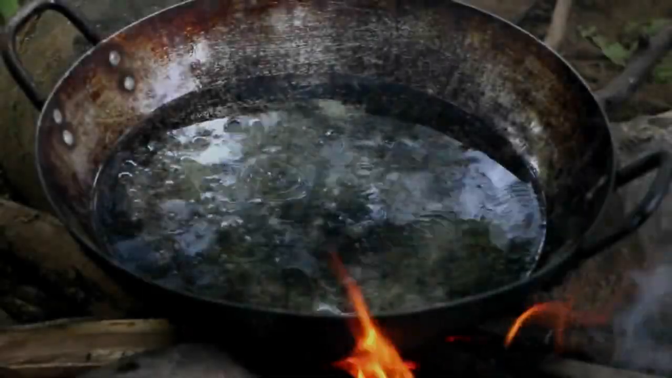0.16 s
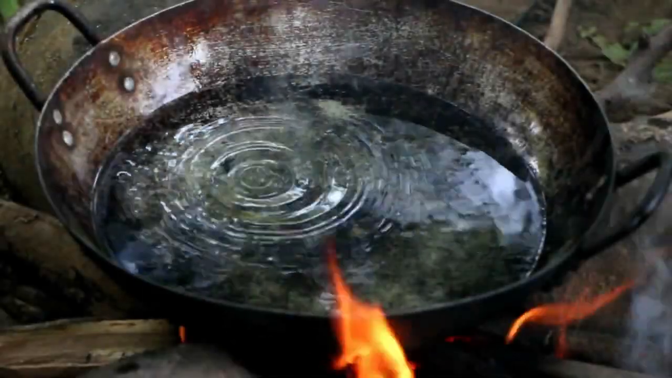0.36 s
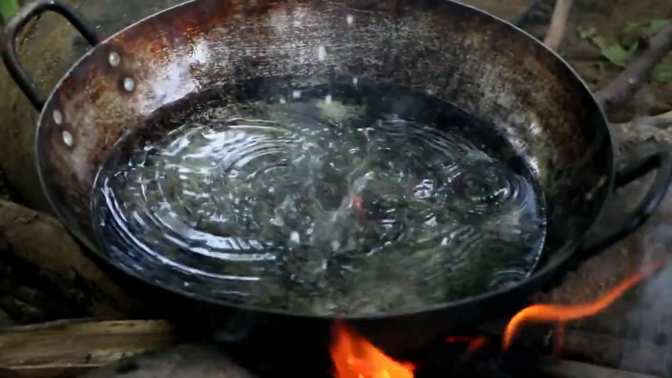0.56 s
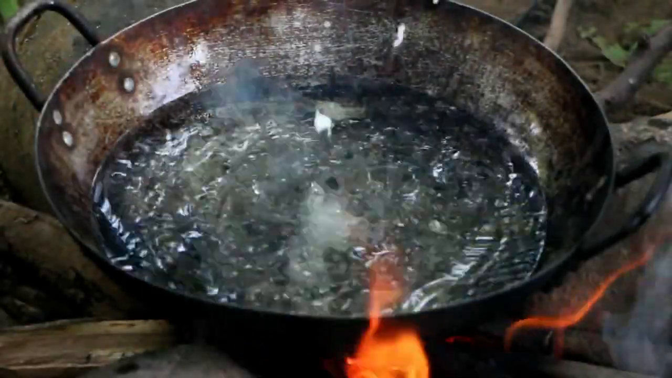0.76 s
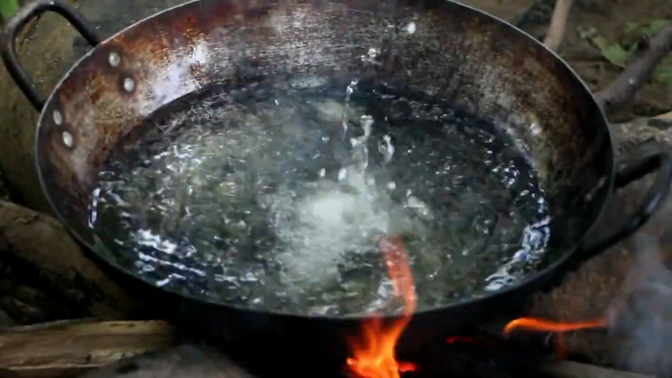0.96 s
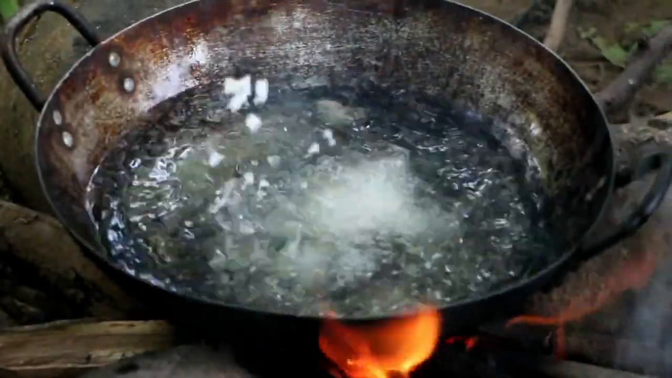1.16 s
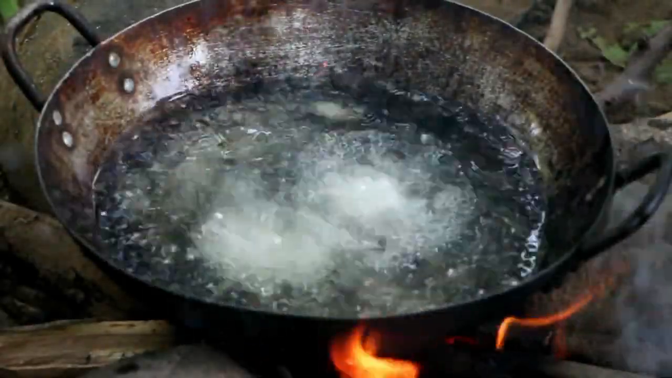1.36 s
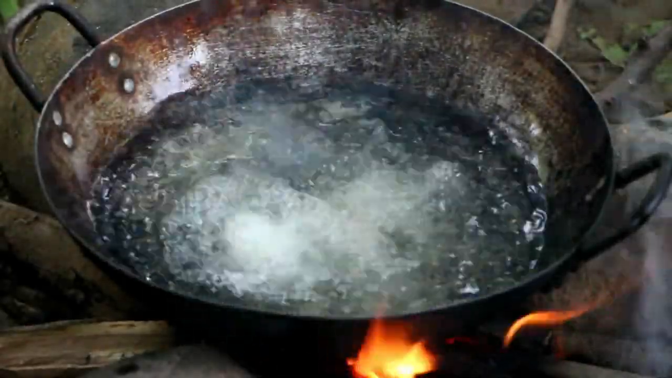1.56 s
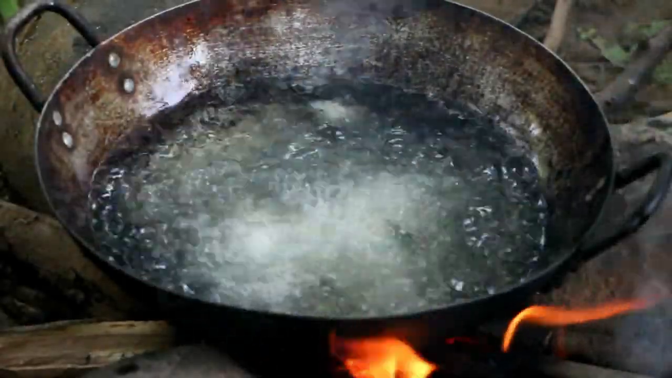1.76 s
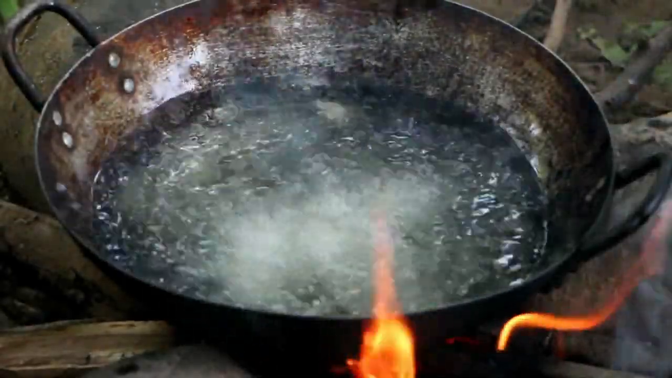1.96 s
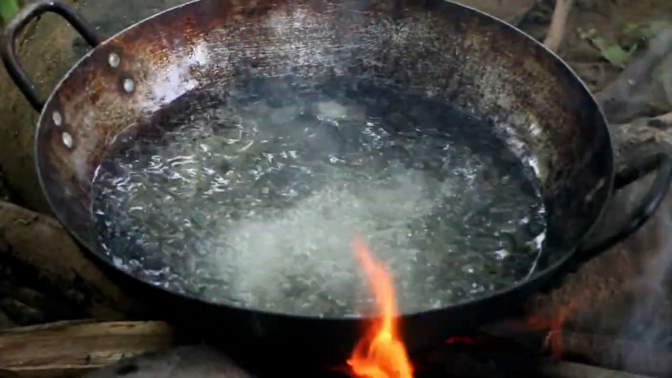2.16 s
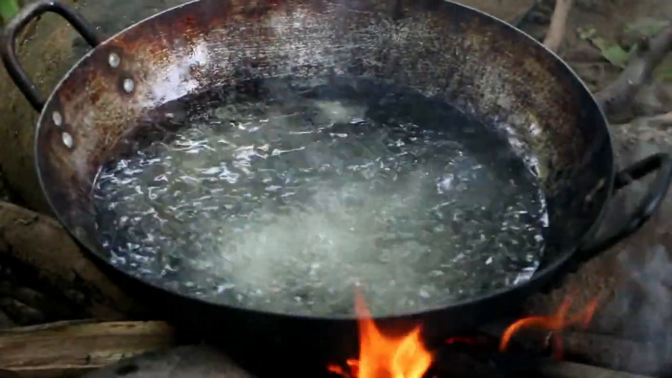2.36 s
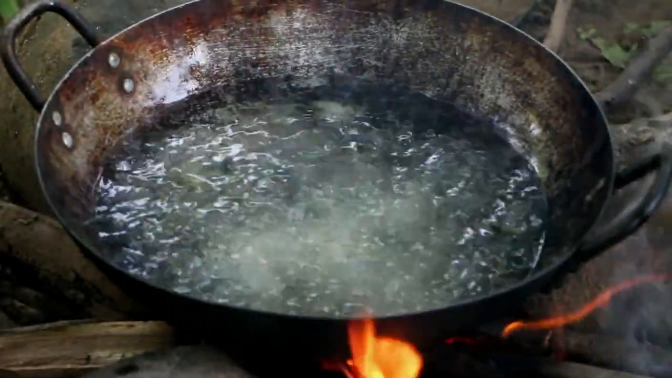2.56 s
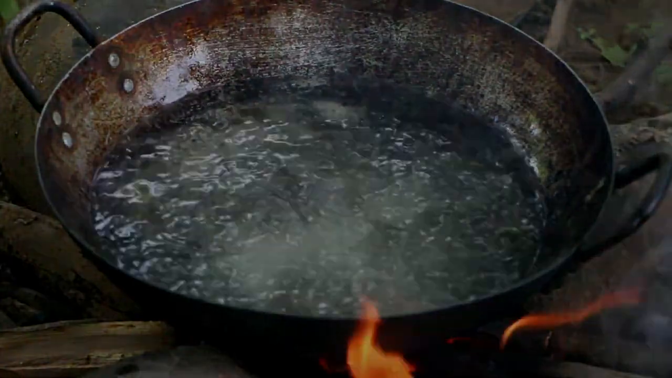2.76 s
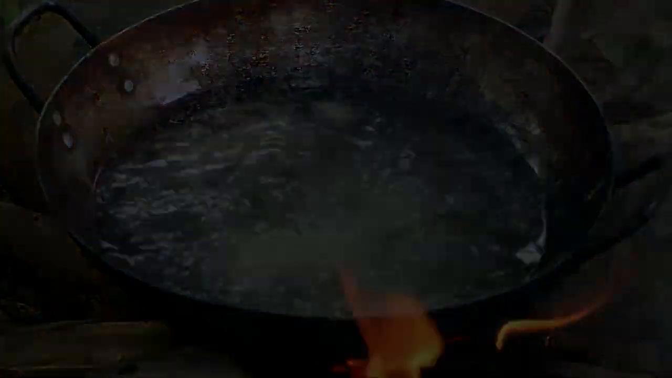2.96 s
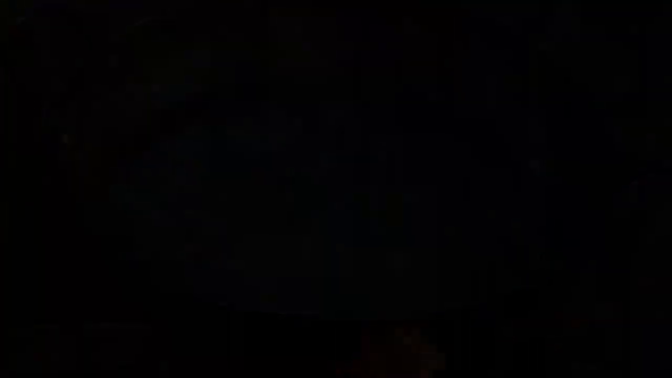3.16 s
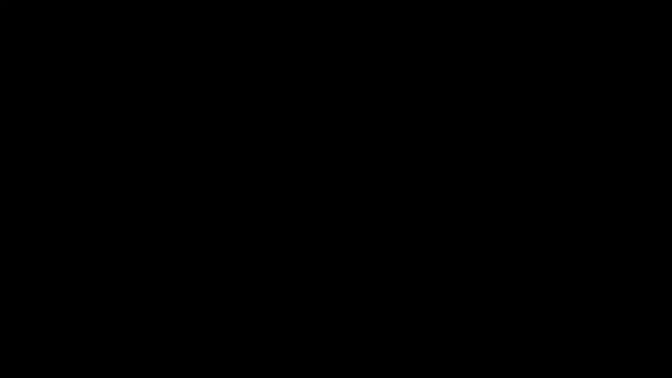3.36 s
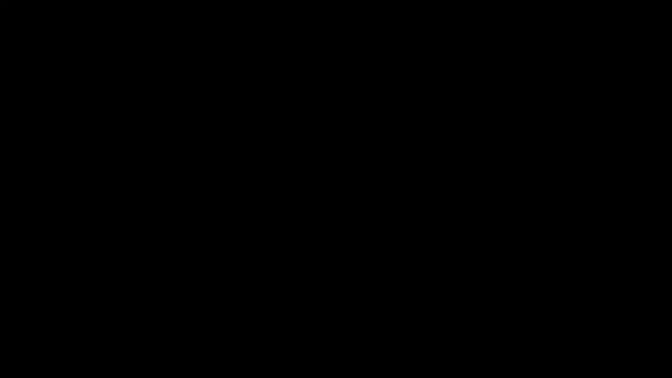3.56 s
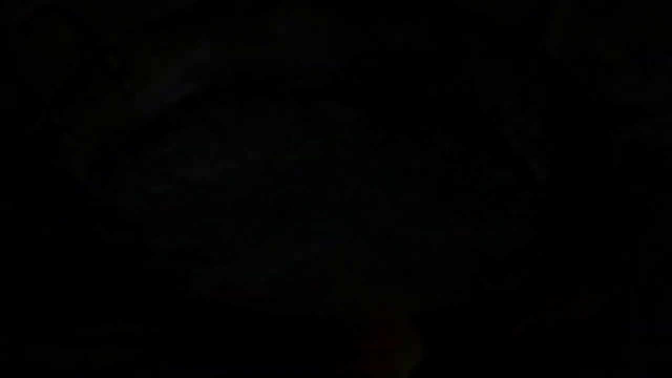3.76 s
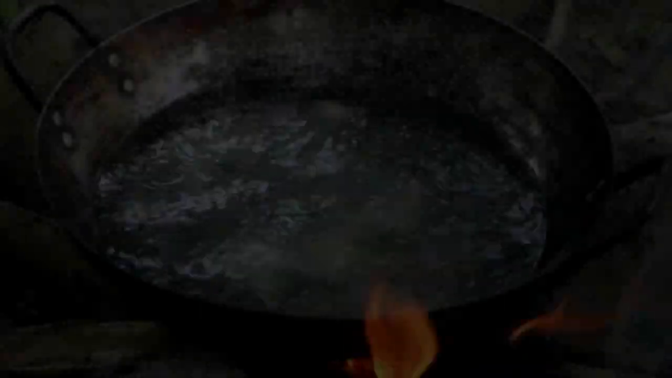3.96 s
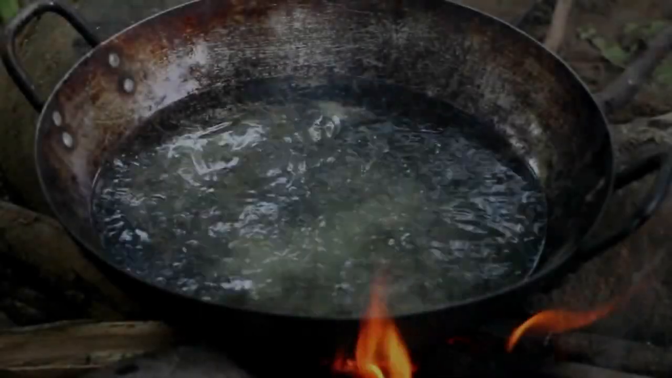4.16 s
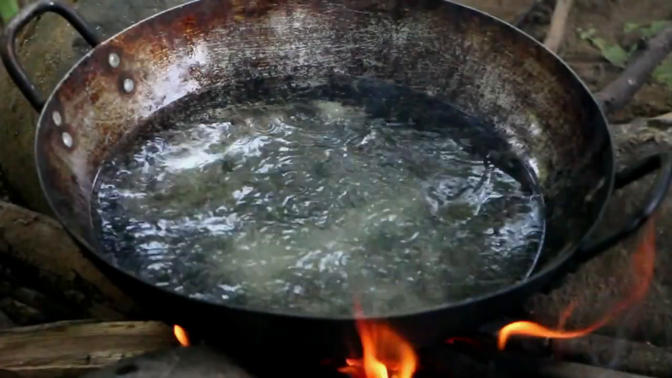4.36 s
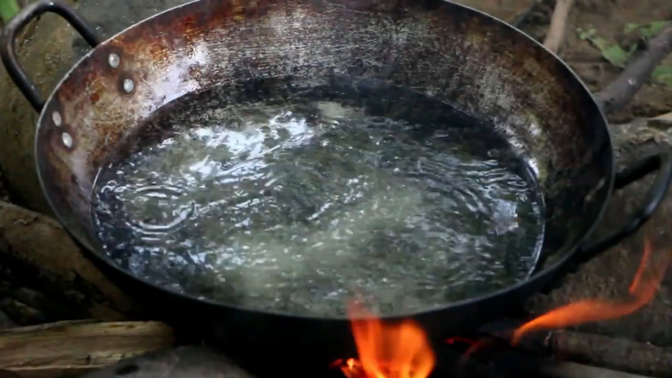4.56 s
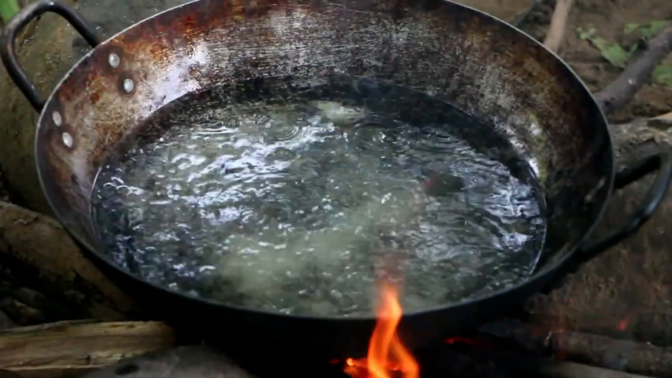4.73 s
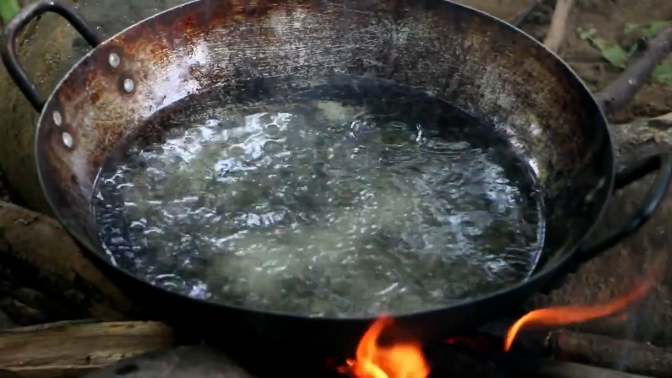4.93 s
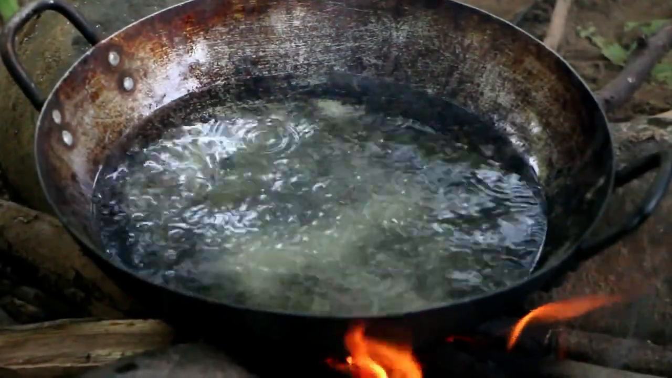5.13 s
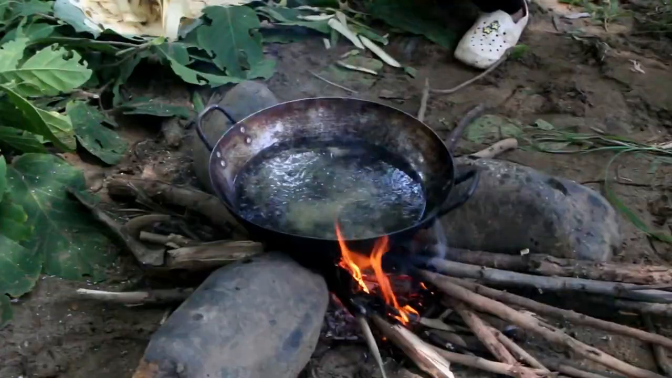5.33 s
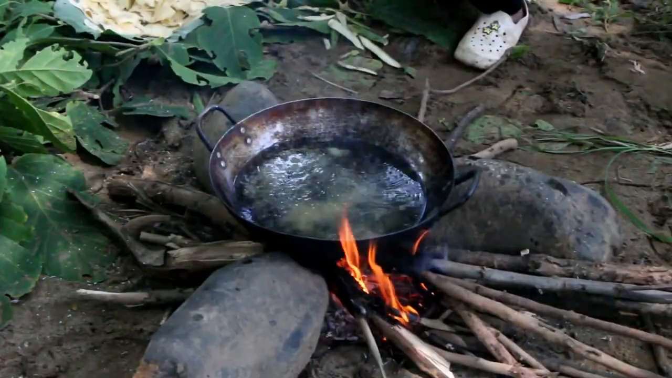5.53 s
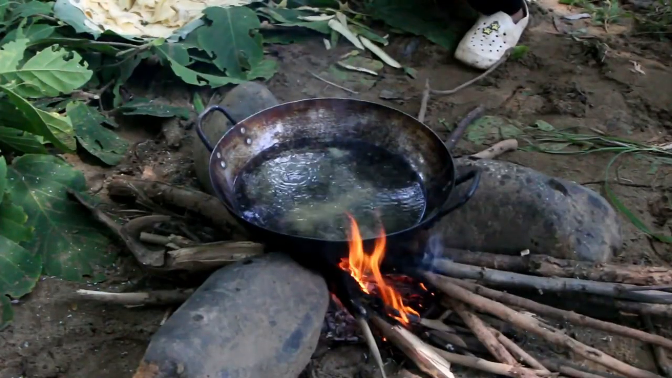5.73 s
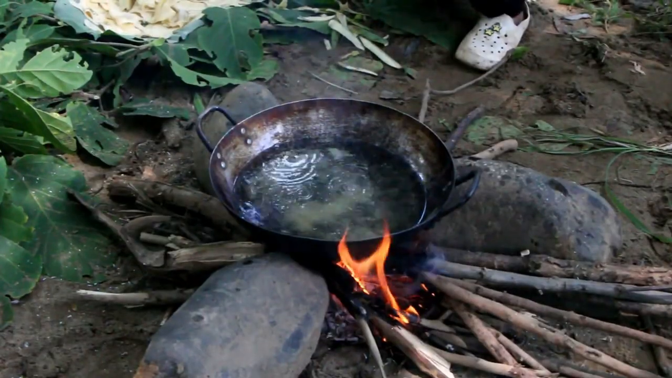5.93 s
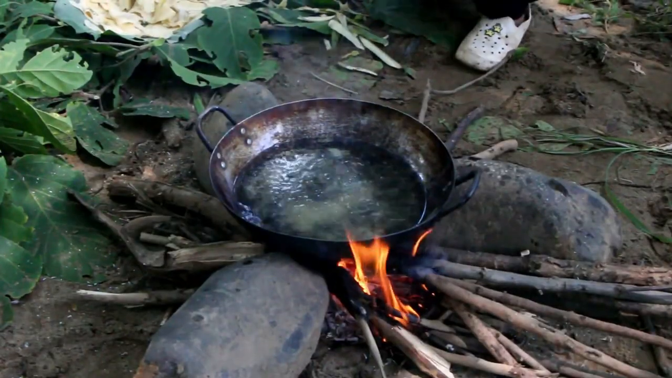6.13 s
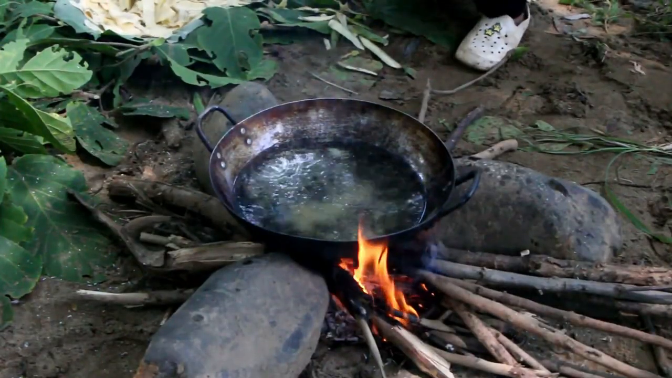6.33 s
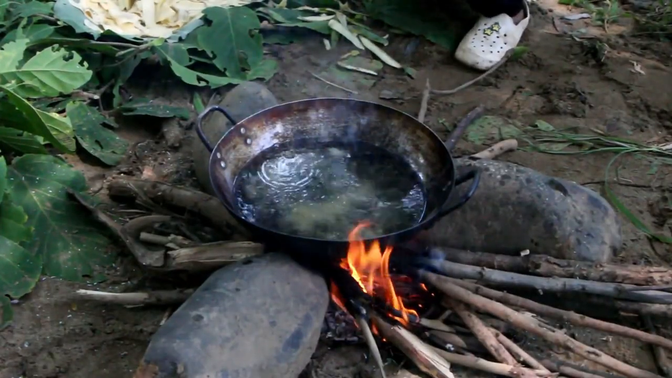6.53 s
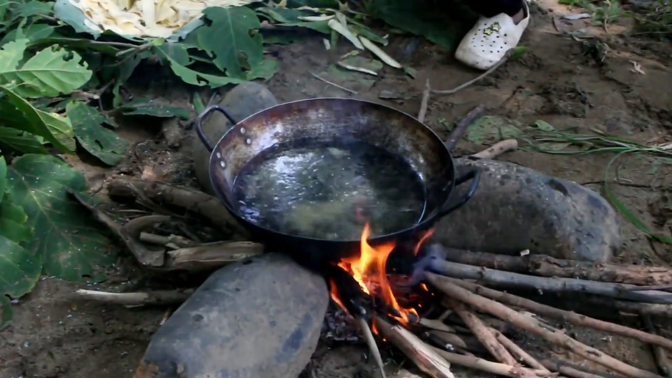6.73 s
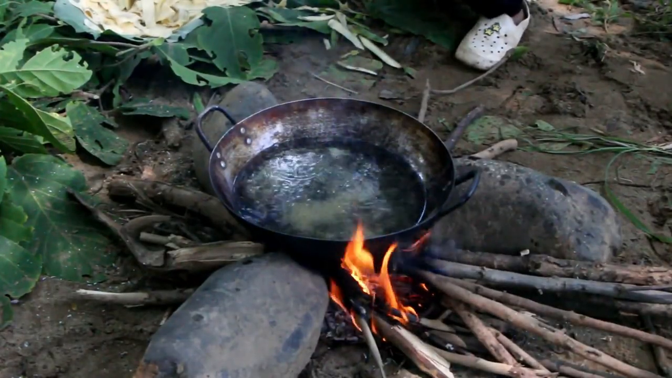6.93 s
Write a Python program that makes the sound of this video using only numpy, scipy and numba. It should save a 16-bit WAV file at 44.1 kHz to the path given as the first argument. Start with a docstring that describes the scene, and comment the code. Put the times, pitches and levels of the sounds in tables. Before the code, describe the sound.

Wet crumbs hit hot oil in an iron pan, erupting in a metallic sizzle that thins to sparse crackles, with birds chirping over faint outdoor hiss.

```python
"""Outdoors, right of the listener: wet crumbs drop into hot oil in an iron bowl over a wood fire.
Steam bubbles, as damped sines, froth up and thin to single pops; the bowl's resonances colour them.
A small bird whistles in the trees; sticks knock, flames murmur and the air hisses steadily (shaped noise).
The sound drops out twice for a moment; after the second gap a distant bird calls, the pan and near bird are silent."""
import sys
import numpy as np
from scipy import signal
from scipy.fft import rfft, irfft, next_fast_len
from scipy.io import wavfile
from scipy.ndimage import uniform_filter1d, map_coordinates
from numba import njit

SR = 44100
rng = np.random.default_rng(int(sys.argv[2]) if len(sys.argv) > 2 else 0)


def put_to_file(sound):
    """Save the sound as 16-bit audio at rate SR, in the file named by the first command-line argument."""
    columns = np.atleast_2d(sound).T  # one column per channel
    safe = np.clip(columns, -1, 1)
    whole_steps = np.round(safe * 32767)
    wavfile.write(sys.argv[1], SR, whole_steps.astype(np.int16))


N = 308435

# Boil strength. Each row: time in s, middle-sized bubbles in dB, small bubbles against them in dB.
BOIL = [(0.3, -81, -12), (0.4, -48.5, 4), (0.46, -34.5, -12), (0.6, -37, -3.5), (0.7, -26.5, -7.5),
        (0.82, -24.5, -14.5), (1.3, -26, -11), (1.84, -27.5, -11), (2.261, -31, -4), (2.419, -34, -3),
        (2.54, -37, -1), (2.572, -45.5, 0.5), (2.6, -38, 4), (2.66, -38.5, -2.5), (2.95, -43, 0),
        (3.28, -48.5, 5), (3.33, -50, 6.5), (3.45, -51.5, 7), (3.64, -50, 2.5), (3.98, -52, 4),
        (4.025, -48, 4.5), (4.05, -50, -3), (4.17, -57.5, 2.5), (4.26, -49, 5), (4.3, -52, 2.5),
        (4.42, -54.5, 3), (4.63, -53, 5), (4.9, -56, 4.5), (5.24, -52, -3)]
# Dropouts. Each row: fade starts in s, silent from s, returns from s, full level at s.
GAPS = [(3.58, 3.594, 3.6155, 3.616), (5.24, 5.278, 5.29, 5.332)]
BOIL_STARTS_S, FIRST_CRUMB_S, PAN_ENDS_S = BOIL[0][0], 0.4, GAPS[1][2]


def pan():
    """The bowl lifts some pitches and its metal rings; the left ear, turned away, hears little direct sound."""
    # Air and iron of the bowl. Each row: centre in Hz, width in Hz, lift in dB.
    bowl_modes = [(460, 128, 3), (1040, 280, -4), (1154, 93, 3.5), (1470, 190, -2.5), (2500, 580, 6),
                  (3230, 200, 6.5), (4500, 96, 2.5), (5870, 61, 4), (7260, 490, 2.5)]
    # Response of what leaves the oil. Each row: frequency in Hz, gain in dB.
    treble = [(60, -34), (250, 1), (400, -6), (750, -7), (1000, -5.5), (4000, 0.5), (8000, -1), (10000, -6),
              (13000, -14.5), (16000, -17)]
    # Ringing modes of the metal. Each row: centre in Hz, width in Hz, gain in dB.
    iron_modes = [(742, 25, -15), (1288, 22, -4), (1712, 30, -9), (1978, 18, 1), (2220, 35, 1),
                  (2600, 40, 4), (2950, 50, 1), (3270, 75, 3), (3640, 60, -7), (4150, 60, -6),
                  (4720, 100, -3)]
    # Direct sound leaking into the left ear's scattered sound. Each row: frequency in Hz, gain in dB.
    leak = [(200, -2), (600, -4), (1500, -8.5), (4000, -13.5), (9000, -13)]
    # Response of the left ear's mix. Each row: frequency in Hz, gain in dB.
    far_side = [(60, -13), (110, -18), (200, -10.5), (380, -12), (700, -13.5), (1290, -13.5), (2380, -15),
                (4400, -11.5), (8120, -11), (15000, -17)]
    ring_db, ring_start_db, damping_s = -3.5, 13, 0.25  # rings freely until thick froth damps it
    ring_shifts_db, mode_groups = 3, 4
    bare_start_db, bare_s = -5, 0.25  # before froth forms, the metal is heard more than the oil

    def lift(f):
        gains = [1 + (amp(db) - 1) * resonance(f, hz, width) for hz, width, db in bowl_modes]
        return amp(along(treble, f)) * np.prod(gains, axis=0)

    def metal(modes):
        return lambda f: sum((-1) ** k * amp(db) * resonance(f, hz, width)
                             for k, (hz, width, db) in enumerate(modes))

    oil = amp(1.5) * froth() + pops()
    since_s = np.clip(np.arange(N) / SR - FIRST_CRUMB_S, 0, None)
    metal_db = ring_db + ring_start_db * np.exp(-since_s / damping_s)
    # the boil wanders over the pan and favours now some modes, now others
    ringing = sum(filtered(amp(metal_db + ring_shifts_db * wobble(8)) * oil, metal(iron_modes[k::mode_groups]))
                  for k in range(mode_groups))
    bare_db = bare_start_db * np.exp(-(since_s / bare_s) ** 2)
    scattered, direct = filtered(amp(bare_db) * oil, lift) + ringing
    leaked = filtered(direct, lambda f: amp(along(leak, f)))
    left = filtered(scattered + leaked, lambda f: amp(along(far_side, f)))
    return amp(3.0) * np.array([left, direct])


def froth():
    """Bubbles of five sizes swell together in spurts of steam."""
    # Largest bubbles, growing as the froth thickens. Each row: time in s, pitch in Hz, level in dB.
    gurgle = [(0.4, 760, -51), (0.58, 756, -38.5), (0.68, 750, -78), (0.739, 632, -37), (1.0, 461, -43.5),
              (1.3, 380, -40), (1.45, 476.4, -38.5), (2.5, 519, -42.5), (2.53, 523, -53), (2.66, 532, -45),
              (2.93, 542, -50.5), (3.0, 546, -51.5), (3.9, 598, -59), (4.3, 570, -59.5), (5.24, 581, -61)]
    # Small bubbles shrink unevenly as the crumbs dry. Each row: time in s, pitch in Hz.
    small_pitch = [(0.4, 4220), (2.5, 5610), (3.2, 6120), (3.45, 7600), (3.8, 6500), (4.02, 7300),
                   (4.25, 6800), (4.4, 5900), (4.63, 7800), (5.24, 7040)]
    # A thick froth boils evenly, a thin one in spurts. Each row: time in s, spurt depth in dB.
    spurt_depth = [(2.0, -0.03), (2.6, 2)]
    # Single large bubbles. Each row: start in s, level in dB.
    gulp_rows = [(0.835, -24), (0.94, -23), (1.035, -22.5), (1.25, -33), (1.44, -26.5), (1.6, -24.5),
                 (1.67, -25.5), (1.83, -32), (1.93, -29.5), (2.14, -29), (2.49, -28.5), (2.895, -30),
                 (3.0, -45), (3.05, -34.5), (3.135, -33), (3.27, -34.5), (3.42, -40), (4.25, -37)]
    # Fine high hiss. Each row: time in s, level against the small bubbles in dB.
    mist_level = [(0.4, -32), (3.2, -20), (3.7, -10), (4.2, -7), (5.24, -7)]
    spray_rel_db, spray_start_db, spray_lag_s = -7.5, -14, 0.23  # against small bubbles; builds up late
    middle_base_hz, middle_follows = 2175, 0.44  # pitch at a gurgle of 500 Hz, exponent of its pitch change

    t = np.arange(N) / SR
    middle_db, small_db = boil()
    spray_db = small_db + spray_rel_db + spray_start_db * np.exp(-np.abs(t - FIRST_CRUMB_S) / spray_lag_s)
    mist_db = small_db + curves(mist_level)[0]
    large_hz, large_db = curves([(0, gurgle[0][1], -90), *gurgle, (PAN_ENDS_S, gurgle[-1][1], -90)])
    middle_hz = middle_base_hz * (large_hz / 500) ** middle_follows
    small_hz = curves(small_pitch)[0]
    spurt_db = curves(spurt_depth)[0] * (wobble(12) + 1.04 * wobble(35))

    middle = bubbles(middle_hz, spread=.5, alike=.82, cycles=28, uneven_db=2, stream_db=1.8, count=1250)
    small = bubbles(small_hz, spread=.24, alike=.92, cycles=28, uneven_db=2, stream_db=4, count=1100)
    spray = bubbles(9500, spread=.22, alike=.6, cycles=20, uneven_db=1.6, stream_db=3, count=1300)
    large = bubbles(large_hz, spread=.065, alike=.5, cycles=34, uneven_db=2.5, stream_db=1.2, count=240)
    mist = bubbles(12800, spread=.13, alike=.3, cycles=12, uneven_db=1, stream_db=1.5, count=900)

    s, db = np.transpose(gulp_rows)
    total = rings(s, large_hz[(s * SR).astype(int)], 37, amp(db))
    total += amp(middle_db + 0.38 * spurt_db) * middle
    total += amp(small_db + 0.52 * spurt_db) * small
    total += amp(spray_db + 0.98 * spurt_db) * spray
    total += amp(large_db + 0.094 * spurt_db) * large
    return total + amp(mist_db) * mist


def boil():
    """Levels in dB of middle-sized and small bubbles: -90 at time zero and again after the second gap."""
    middle_db, finer_db = curves([(0, -90, 0), *BOIL, (PAN_ENDS_S, -90, 0)])
    middle_db = middle_db + surges()
    return middle_db, middle_db + finer_db


def surges():
    """Lift in dB as the boil flares up: each flare starts at once and dies away exponentially."""
    # Each row: start in s, lift in dB, decay time constant in s.
    flares = [(0.4, 6.5, 0.03), (0.508, 8.5, 0.0074), (0.5352, 10.5, 0.006), (0.562, 6, 0.0088),
              (0.574, 6, 0.011), (0.603, 5, .015), (0.623, 0.5, .012), (0.675, 1, 0.061), (1.026, 4, 0.058),
              (1.289, 5, 0.032), (2.285, 3, 0.045), (2.46, 0.5, .08)]
    t = np.arange(N) / SR
    return sum(db * (t > s) * np.exp(-np.abs(t - s) / life_s) for s, db, life_s in flares)


def bubbles(centre_hz, spread, alike, cycles, uneven_db, stream_db, count):
    """Each wet crumb gives off a short stream of like-sized bubbles: most are faint, a few stand out."""
    thinning = 1.4  # streams are born ever more rarely (1 = evenly)
    born, life = rng.random((2, count, 1))
    size, strength = rng.standard_normal((2, count, 1))
    when, luck = rng.random((2, count, 24))
    stream_s = .03 + .1 * life
    s = BOIL_STARTS_S + born ** thinning * (PAN_ENDS_S - BOIL_STARTS_S) + stream_s * (when - .5)
    shape = alike * size + np.sqrt(1 - alike ** 2) * rng.standard_normal(s.shape)
    base_hz = np.broadcast_to(centre_hz, N)[(s * SR).astype(int)]
    hz = base_hz * np.exp(spread * np.clip(shape, -2.3, 3))
    sparse = 0.072 + 0.94 * born  # as the boil dies down, single streams and bubbles stand out more
    gain = amp(sparse * (stream_db * strength - uneven_db * np.log(luck + 0.0063)))
    gain *= (born + 0.025) ** ((thinning - 1) / 2)  # evens out dense and sparse stretches
    return unit(rings(s.ravel(), hz.ravel(), cycles, gain.ravel()))


def pops():
    """A trapped drop flashes to steam: a snap, then a spatter of low, middle and high droplets."""
    # Strongest pops. Each row: start in s, level in dB, pitch in Hz.
    loud_pops = [(0.289, -27, 7360), (0.35, -24.5, 5550), (0.351, -44, 2480), (0.3795, -25, 4950),
                 (0.388, -28, 3300), (0.399, -32, 4930), (0.5004, -17, 5840), (0.5089, -11, 2600),
                 (0.5234, -18.5, 3100), (0.5361, -8, 2310), (0.565, -20, 3200), (0.5735, -6, 2700),
                 (0.581, -10, 3020), (0.5894, -22, 3260), (0.622, -10, 3280), (2.034, -12, 4230),
                 (2.0615, -14, 2483), (2.09, -18, 3312), (2.149, -14.5, 2600), (2.2827, -9.5, 4750),
                 (2.2944, -11, 2880), (2.2995, -17, 3000), (2.4614, -15.5, 2440), (2.4783, -11.5, 3420),
                 (2.4785, -7, 8400), (2.4864, -7.5, 4300), (2.5024, -21, 2500), (2.5806, -9, 3660),
                 (2.607, -24, 3000), (2.7274, -23, 2630), (2.7305, -10, 6500), (2.7414, -13, 3470),
                 (2.7545, -32, 6500), (2.7744, -19.5, 1970), (2.824, -17, 6260), (2.828, -24, 1500),
                 (2.8773, -19, 6800), (2.889, -16, 6760), (3.0292, -13, 5640), (3.036, -28, 3020),
                 (3.048, -30, 2200), (3.0525, -19, 7400), (3.056, -27, 5000), (3.0742, -15, 7500),
                 (3.083, -28, 3280), (3.097, -35, 9500), (3.11, -13, 5130), (3.119, -11, 7740),
                 (3.128, -29, 8000), (3.14, -33, 9500), (3.172, -21.5, 3830), (3.2175, -25, 10500),
                 (3.2221, -10.5, 7600), (3.2324, -15, 5670), (3.233, -23.5, 2270), (3.242, -26, 6500),
                 (3.2514, -19, 7340), (3.264, -18, 7250), (3.274, -12, 6910), (3.29, -12, 5940),
                 (3.2974, -18, 5270), (3.3005, -21.5, 3530), (3.316, -18, 8000), (3.6812, -28.5, 2400),
                 (3.6835, -21, 7500), (3.691, -32, 5500), (3.701, -18.5, 5060), (3.725, -23, 7000),
                 (3.736, -33, 5010), (3.749, -22, 9500), (3.758, -14.5, 6600), (3.773, -32, 9500),
                 (3.7868, -17, 7040), (3.801, -22, 7500), (3.9534, -15.5, 8200), (3.959, -19.5, 4900),
                 (3.97, -20.5, 6100), (4.064, -20.5, 4640), (4.07, -20, 10000), (4.0896, -19, 5540),
                 (4.103, -18, 8980), (4.109, -28, 6450), (4.13, -19, 10000), (4.149, -21.5, 7180),
                 (4.1985, -32, 700), (4.1974, -29, 2220), (4.199, -20, 8550), (4.218, -14.5, 9600),
                 (4.2403, -27, 6400), (4.283, -27, 4700), (4.299, -16, 7560), (4.2995, -18, 5000),
                 (4.305, -20, 9000), (4.3186, -21.5, 1920), (4.319, -27.5, 640), (4.331, -19, 7240),
                 (4.336, -19, 7500), (4.344, -15, 7300), (4.355, -23, 5800), (4.356, -27, 3120),
                 (4.361, -19.5, 5530), (4.39, -21, 10590), (4.4588, -19, 6640), (4.459, -26, 3570),
                 (4.462, -23.5, 1750), (4.4645, -15.5, 6900), (4.4846, -20, 5900), (4.498, -28, 5500),
                 (4.518, -28, 6500), (4.743, -24, 3850), (4.763, -20.5, 4230), (4.7724, -15, 8500),
                 (4.782, -21, 8800), (4.8344, -19, 8600), (4.846, -26, 10000), (4.862, -25, 6000),
                 (4.8944, -28, 8600), (4.9198, -17.5, 5660), (4.949, -21, 5830), (4.968, -24, 7500),
                 (4.989, -30, 10000), (5.072, -16, 9300), (5.095, -23.5, 4480), (5.131, -27, 4260),
                 (5.159, -23, 6600), (5.179, -31, 3850)]
    # Drying crumbs spatter more briefly. Each row: time in s, spatter length in s.
    spatter_length = [(0.5, 0.021), (2.6, .012), (3.0, .007)]
    snap_db, crack_db = -4, -4  # against the pop; the crack is the short, broad first part
    middle_db, low_db, high_db = -3, -2, -14  # droplets against the pop
    octave_db = -10  # low and high droplets, per octave away from the pop's pitch
    low_hz, high_hz = 2300, 9800

    s, db, hz = np.vstack([loud_pops, faint_pops(count=170)]).T[:, :, None]
    lag, offset, loss = rng.random((3, len(s), 14))
    late_s = s + np.interp(s, *np.transpose(spatter_length)) * lag ** 1.7
    fade_db = -15 * lag - 6 * loss

    def away_db(other_hz):
        return octave_db * np.abs(np.log2(hz / other_hz))

    pitch_hz = [hz * np.exp(0.58 * (offset - .45)),
                low_hz * np.exp(1.39 * (loss - .45)),
                high_hz * np.exp(0.66 * (offset - .45))]
    level_db = db + fade_db + [middle_db + 0 * hz, low_db + away_db(low_hz), high_db + away_db(high_hz)]
    sign = rng.choice([-1, 1], 3 * late_s.size)
    snap = rings(s[:, 0], hz[:, 0], 18, amp(db[:, 0] + snap_db))
    crack = rings(s[:, 0], hz[:, 0], 3, amp(db[:, 0] + crack_db))
    spatter = rings(np.tile(late_s.ravel(), 3), np.ravel(pitch_hz), 18, amp(np.ravel(level_db)) * sign)
    return snap + crack + spatter


def faint_pops(count):
    """Many weaker pops at random once the froth thins, levelled by the small bubbles; rows as in pops."""
    from_s, over_small_db, spread_db = 2.0, 14, 2.2
    when, size, luck = rng.random((count, 3)).T
    s = from_s + (GAPS[1][0] - from_s) * when
    db = boil()[1][(s * SR).astype(int)] + over_small_db - spread_db * np.log(luck + 0.12)
    return np.transpose([s, db, 10500 * np.exp(-0.9 * size ** 1.2)])


def bird():
    """A thin whistle sliding up or down, lingering among the trunks; cut off after the second gap."""
    # Each row: start in s, length in s, share of the length at which the top pitch falls,
    # start pitch in Hz, top pitch in Hz, end pitch in Hz, level in dB.
    notes = [(1.223, 0.04, 0.65, 6230, 7040, 7100, -39.5), (1.341, 0.044, 0.27, 8400, 8700, 7260, -41),
             (1.479, 0.034, 0.94, 6300, 7150, 7100, -39.5), (1.567, 0.066, 0.41, 8100, 8160, 7100, -39),
             (1.72, 0.052, .85, 6350, 7200, 7150, -37.5), (1.838, 0.042, 0.32, 8170, 8220, 7000, -40.5),
             (4.533, 0.072, 0.41, 5800, 6560, 6490, -41.5), (4.732, 0.041, .9, 6500, 7500, 7450, -36.5),
             (4.843, 0.053, 0.42, 8270, 8260, 7260, -44.5), (4.979, 0.043, .75, 5850, 7370, 7430, -33),
             (5.085, 0.054, 0.36, 8000, 8340, 6730, -36.5), (5.226, 0.036, .7, 5810, 6100, 5960, -44.5)]
    arc, edge_share = 1.5, 0.21  # lingers near the top pitch; attack and release as shares of the length
    farther_until_s, farther_db = 3, -2.5  # the first song comes from deeper in the trees: less direct sound

    song, t = np.zeros(N), np.arange(N) / SR
    for s, length_s, top, from_hz, top_hz, to_hz, db in notes:
        age = np.clip((t - s) / length_s, 0, 1)
        before = np.clip(1 - age / top, 0, 1)
        after = np.clip((age - top) / (1 - top), 0, 1)
        hz = top_hz - (top_hz - from_hz) * before ** arc - (top_hz - to_hz) * after ** arc
        swell = np.clip(np.minimum(age, 1 - age) / edge_share, 0, 1)
        song += amp(db) * np.sqrt(2) * swell * np.sin(2 * np.pi * np.cumsum(hz) / SR)
    song *= amp(3 * wobble(350))  # a rasp
    direct = amp(farther_db * (t < farther_until_s)) * song
    audible = t < PAN_ENDS_S
    return audible * amp([[-7], [3]]) * (direct + echoes(song, t60=0.4, count=20000))


def far_bird():
    """Faint falling calls that arrive only as echoes."""
    # Each row: start in s, level in dB, pitch in Hz.
    call_rows = [(5.595, -57, 5350), (6.115, -56, 5350), (6.675, -53, 5250)]
    calls, t = np.zeros(N), np.arange(N) / SR
    for s, db, base_hz in call_rows:
        age = np.clip((t - s) / 0.05, 0, 1)
        hz = base_hz * (1.01 - 0.22 * age ** 2.5)
        calls += amp(db) * np.sin(np.pi * age) * np.sin(2 * np.pi * np.cumsum(hz) / SR)
    calls *= amp(5 * wobble(300))  # leaves roughen the whistle
    return amp([[-7], [1.5]]) * echoes(calls, t60=0.24, count=12000)


def thumps():
    """Burning sticks settle with short, dull knocks: damped sines."""
    # Each row: start in s, level in dB, pitch in Hz.
    knocks = [(2.645, -45, 160), (4.029, -45, 173), (4.493, -46.5, 210), (4.788, -42, 215),
              (5.09, -42, 710), (5.119, -40, 710), (5.165, -38, 660), (5.209, -34.5, 1410),
              (6.085, -41.5, 590), (6.689, -39, 690), (6.876, -45, 152)]
    s, db, hz = np.transpose(knocks)
    return amp([[-4], [3.5]]) * rings(s, hz, 21.6, amp(db))


def flames():
    """The low, flickering murmur of the flames: shaped noise, unrelated between the ears."""
    # Spectrum. Each row: frequency in Hz, relative density in dB per Hz.
    flame_spectrum = [(30, -36.5), (60, -11), (120, -10), (200, 5), (400, -10), (800, -30.5)]
    noise = filtered(rng.standard_normal((2, N)), lambda f: amp(along(flame_spectrum, f)))
    flicker_db = -68 + 1.5 * wobble(0.9) + 1.7 * wobble(5.8)
    return amp([[-2.5], [1.5]]) * amp(flicker_db) * unit(noise)


def open_air():
    """A steady, slightly patchy hiss: shaped noise, unrelated between the ears."""
    # Spectrum. Each row: frequency in Hz, relative density in dB per Hz.
    hiss_spectrum = [(15, -51), (30, -18.5), (65, -9.5), (160, -7), (390, -6), (471, -4), (510, -6.5),
                     (616, -3), (898, -5.5), (1080, -4.5), (3850, -12), (5310, -16), (5920, -17.5),
                     (15600, -36.5)]
    # Balance. Each row: frequency in Hz, left minus right in dB.
    hiss_balance = [(60, 1), (110, -4), (200, -5), (380, -6.5), (700, -8), (1290, -9), (2380, -10),
                    (4400, -7), (8120, -6), (15000, 0.5)]
    z = signal.stft(rng.standard_normal((2, N)), nperseg=512)[2]
    patches = rng.standard_normal(z.shape[1:])
    for axis in (0, 1):  # smooth over frequency, then time
        patches = uniform_filter1d(patches, 8, axis)
    noise = signal.istft(z * amp(1.6 * unit(patches)), nperseg=512)[1][:, :N]
    hiss = filtered(noise, lambda f: amp(along(hiss_spectrum, f)
                                         + np.outer([.7, -.3], along(hiss_balance, f))))
    return amp(-49 + 0.2 * wobble(21)) * unit(hiss)


def rings(s, hz, cycles, gain):
    """Damped sines, 60 dB down after some cycles; each reaches the left ear by another, longer path."""
    out, hz = np.zeros((2, N)), np.clip(hz, 100, SR * .4)
    detour_s = rng.random(len(s)) * 0.0022
    step = 2 * np.pi * hz / SR
    decay = np.log(1000) * hz / np.maximum(cycles, 1) / SR
    for ear, lag_s in zip(out, (detour_s, 0)):
        add(ear, ((s + lag_s) * SR).astype(np.int64), step, decay, gain, .3)
    return out


@njit
def add(out, at, step, decay, gain, soft):
    """Adds damped sines with a soft start, each until it has died away."""
    for k in range(len(at)):
        turn, swing, start = np.exp(1j * step[k] - decay[k]), gain[k] + 0j, 1.0
        opening = np.exp(-soft * step[k])
        for i in range(at[k], min(at[k] + int(6 / decay[k]), len(out))):
            out[i] += swing.imag * (1 - start)
            swing *= turn
            start *= opening


def resonance(f, hz, width):
    """Response of one mode, 1 at its centre."""
    return 1j * f * width / (hz * hz - f * f + 1j * f * width)


def echoes(x, t60, count):
    """A diffuse answer, different in each ear, dying by 60 dB in t60 seconds."""
    tail = rng.standard_normal((2, count)) * amp(-60 * np.arange(count) / SR / t60)
    tail /= np.linalg.norm(tail, axis=1)[:, None]
    return signal.fftconvolve(x[None], tail, axes=1)[:, :N]


def filtered(x, response):
    """x through a response given as a function of Hz."""
    m = next_fast_len(N + SR // 2)
    return irfft(rfft(x, m) * response(np.fft.rfftfreq(m, 1 / SR)), m)[..., :N]


def wobble(rate):
    """A smooth random curve, rate knots a second."""
    knots = rng.standard_normal(int(N * rate / SR) + 4)
    return map_coordinates(knots, [np.arange(N) * rate / SR])


def curves(rows):
    """One value per sample for each column after the time."""
    s, *cols = np.transpose(rows)
    return [np.interp(np.arange(N) / SR, s, c) for c in cols]


def along(points, hz):
    """(Hz, value) points interpolated on a log frequency axis."""
    f, v = np.transpose(points)
    return np.interp(np.log(hz + 1), np.log(f + 1), v)


def amp(db):
    """Gain of a level in dB."""
    return 10 ** (np.asarray(db) / 20)


def unit(x):
    """Scaled to rms 1."""
    return x / np.sqrt(np.mean(x ** 2) + 1e-20)


def scene():
    """Pan, birds, fire and open air together."""
    return pan() + bird() + far_bird() + thumps() + flames() + open_air()


def record(dry):
    """The level sags, fades to silence in each gap, and nothing passes above the band limit."""
    # Sag of the whole sound around the first gap. Each row: time in s, level in dB.
    sag = [(2.7, 0), (3.6, -4.5), (4.25, 0)]
    top_hz, floor_db = 15750, -50  # silent at the floor
    t = np.arange(N) / SR
    fade_db = sum(np.interp(t, gap, [0, floor_db, floor_db, 0]) for gap in GAPS)
    faded = dry * amp(fade_db + curves(sag)[0]) * (fade_db > floor_db)
    return filtered(faded, lambda hz: hz < top_hz)


dry = scene()
out = record(dry)
put_to_file(out)
```